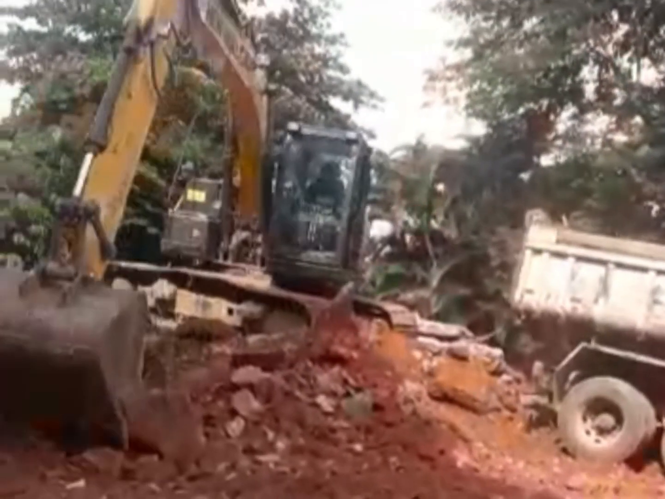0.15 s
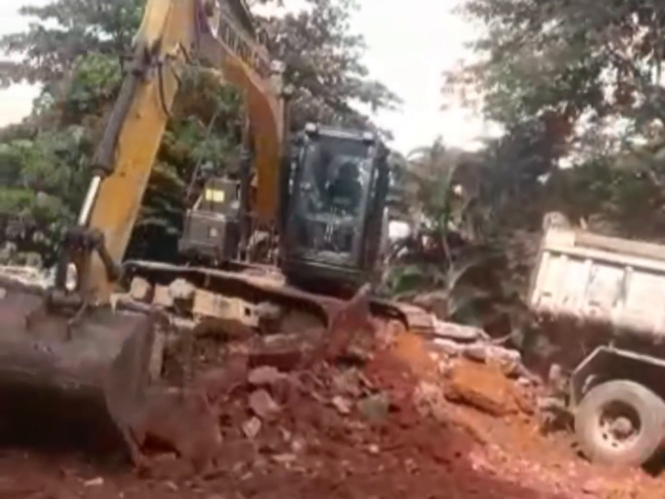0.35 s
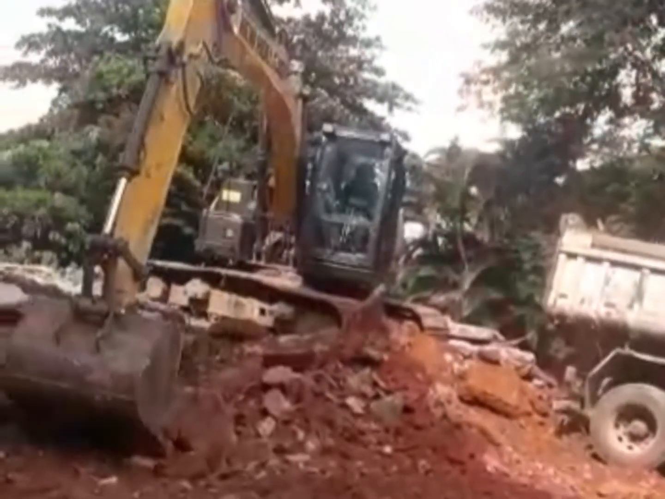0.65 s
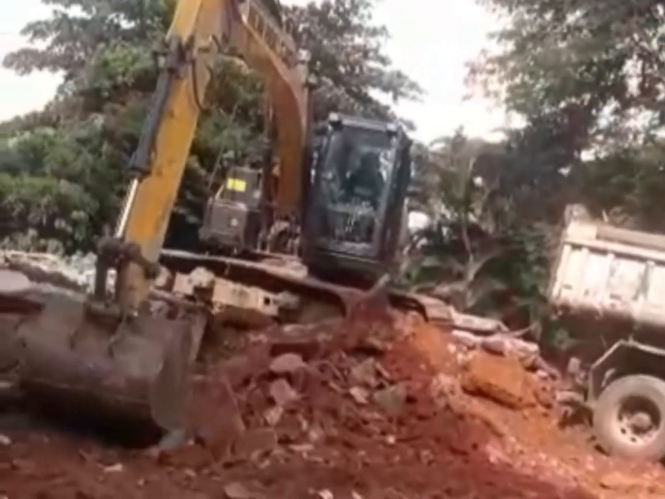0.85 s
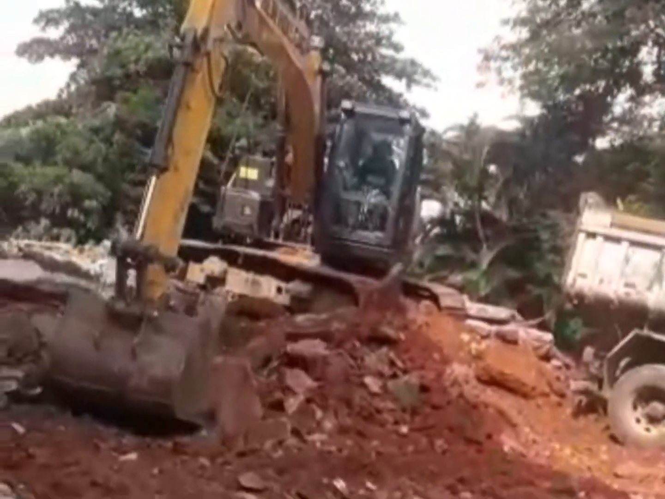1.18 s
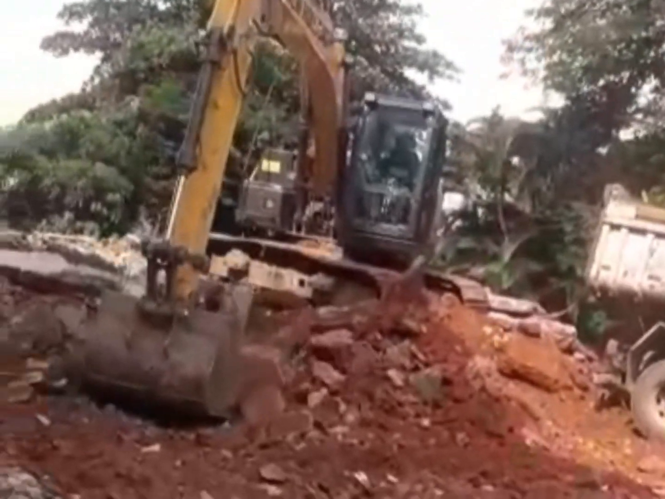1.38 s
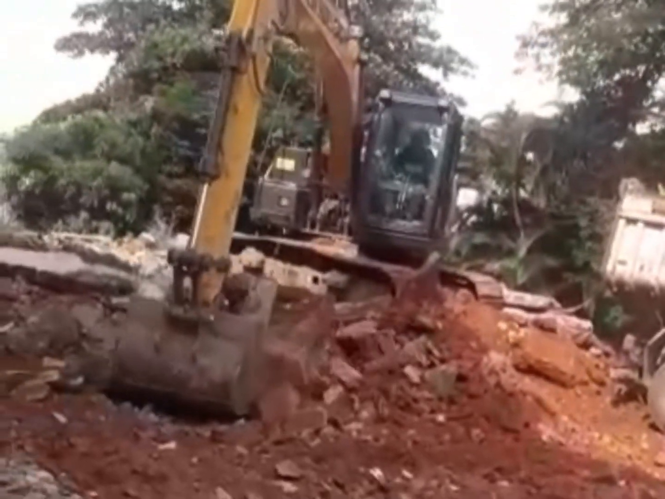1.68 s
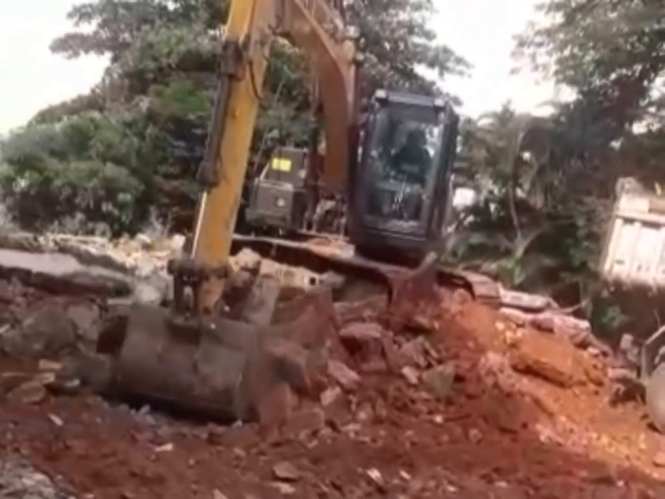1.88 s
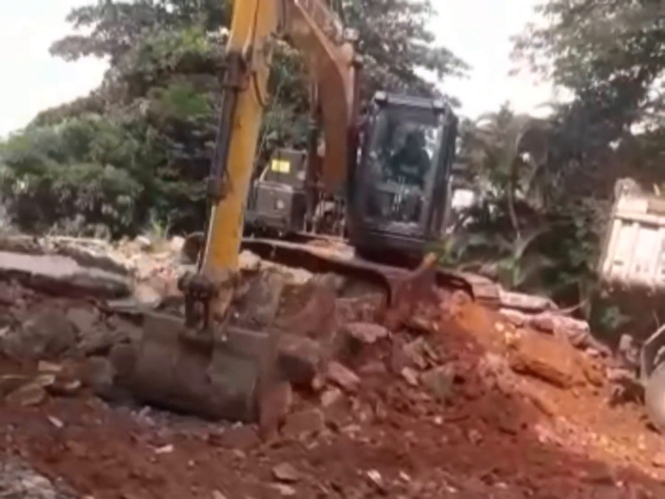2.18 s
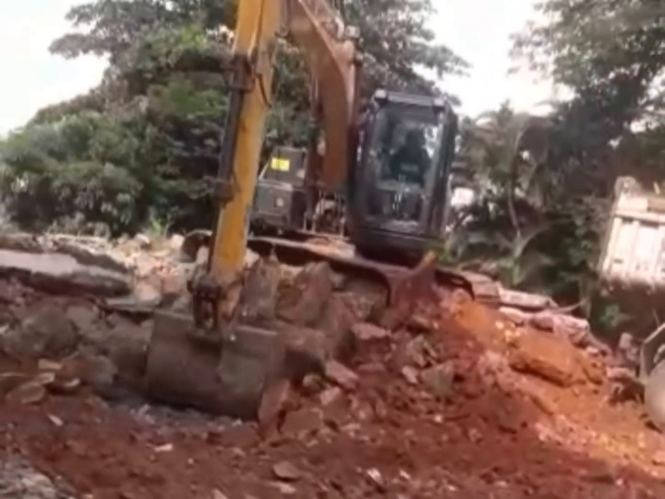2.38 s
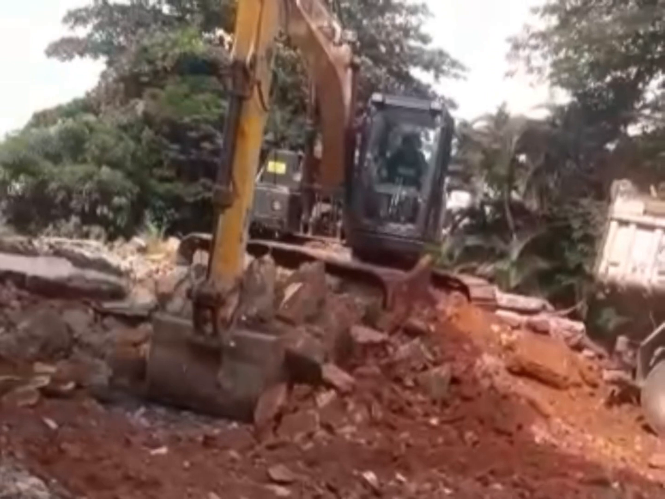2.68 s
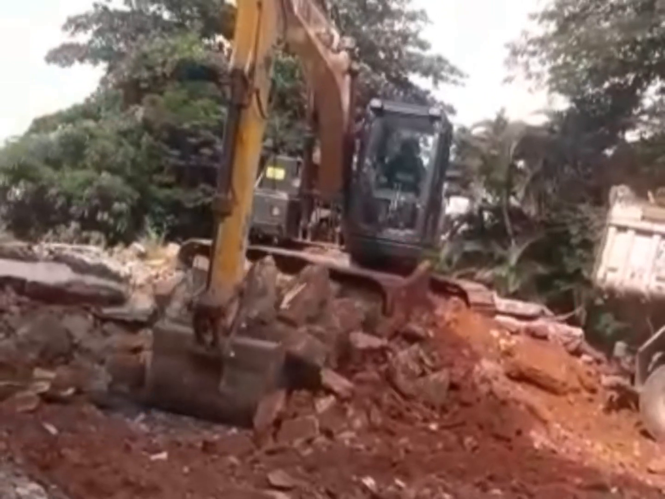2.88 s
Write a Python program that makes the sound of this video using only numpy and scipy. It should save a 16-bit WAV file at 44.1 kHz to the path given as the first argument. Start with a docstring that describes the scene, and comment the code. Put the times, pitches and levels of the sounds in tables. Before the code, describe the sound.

An excavator digs outdoors a few metres away, with a steady diesel rumble and faint hydraulic whine. At about 0.2 seconds its steel bucket clanks down, then grinds and groans through rubble, booming near 0.7. Lighter scrapes, jolts and crackling grit follow. A second shove comes around 2.2 seconds with hollow booms, then stones knock and crack from 2.4 to 3, loudest near 2.8.

```python
"""A diesel rumbles and hydraulic pumps whine: an excavator is working outdoors, a few metres away.
Its steel bucket clanks down and drags through rubble in two main shoves. Many tiny slips make the
teeth grind, and the hollow bucket groans and booms as it jolts over buried rock.
Stones knock, crack and rasp, soil hisses over the steel and grit crackles off the heap."""
import sys
import numpy as np
from scipy import signal
from scipy.fft import rfft, irfft
from scipy.io import wavfile

SR = 44100
rng = np.random.default_rng(int(sys.argv[2]) if len(sys.argv) > 2 else 0)


def generate_wav(signal):
    """Clip the signal to [-1, 1] and save it as 16-bit WAV at the path in sys.argv[1]."""
    frames = np.transpose(np.atleast_2d(signal))
    scaled = np.clip(frames, -1, 1) * 32767
    pcm = np.round(scaled).astype(np.int16)
    wavfile.write(sys.argv[1], SR, pcm)


N = 134505
TIME = np.arange(N) / SR
RING_TIME = TIME[:SR // 2]  # half a second for each short sound

# Levels compare rows within a table. t60 is the time to die away by 60 dB; fade, to fall to 37%.
# low tones of the diesel (multiple of its cycle rate, level/dB)
ENGINE_TONES = [(5, -49), (8, -52), (10, -52.5), (12, -43), (16, -42), (20, -53), (30, -46.5), (42, -50)]
# tone colour of the engine and fan noise (f/Hz, level/dB)
ROAR_COLOUR = [(20, -42), (42, -16.5), (70, -4.5), (115, -2.5), (190, -3), (280, -5), (380, -16),
               (470, -15), (660, -13), (950, -19), (1500, -25), (2200, -30.5), (3200, -43.5), (4500, -52),
               (6500, -61.5), (8000, -61), (10000, -77)]
# ring of the knocking cylinder (f/Hz, level/dB, t60/s)
CYLINDER_MODES = [(244, 2, 0.042), (342.5, 2.5, 0.011), (441, -5.5, 0.045)]
# whines of the pumps (f/Hz, level/dB)
WHINES = [(425, -56.5), (565, -51.5), (600.5, -45.5)]
# soil slides over the steel (loudest t/s, level/dB, half length/s)
SLIDES = [(.565, -62, .025), (.64, -62, .045), (2.13, -70, .06)]
# tone colour of sliding soil (f/Hz, level/dB)
SOIL_COLOUR = [(3000, -25), (5100, -10), (5700, 0), (6500, -1), (7400, -13), (9600, -24), (12000, -17),
               (15500, -15)]
# flow of grit round the bucket (t/s, level/dB)
GRIT_FLOW = [(0, -64), (.46, -66), (.58, -63), (.68, -59), (.77, -57), (.9, -67.5), (1.5, -63.5),
             (1.7, -59.5), (1.9, -63), (2.13, -58), (2.3, -61), (2.56, -64), (3.05, -63)]
# tone colour of grit and stone chips (f/Hz, level/dB)
GRIT_COLOUR = [(1500, -7.5), (2600, 8), (4000, -3), (5000, -4.5), (6200, -7), (7300, -11.5), (8300, -23),
               (9600, -25.5), (12000, -18.5), (16000, -14.5)]
# stones crack under the steel (t/s, level/dB, lowest f/Hz, highest f/Hz, fade/s)
CRACKS = [(.24, -38, 3060, 4150, 0.01), (.368, -63, 5000, 8000, 0.0041), (.75, -55, 3000, 6870, 0.0207),
          (1.402, -56, 3500, 7000, 0.0063), (1.632, -55.5, 7000, 15500, 0.0043),
          (1.934, -57, 5200, 5700, 0.0045), (2.344, -61, 6300, 13800, .007),
          (2.476, -48.5, 3400, 7000, .009), (2.686, -55, 3400, 7000, 0.013), (2.781, -49, 3500, 6500, .003)]
# rocks rasp along the steel (t/s, level/dB, centre f/Hz, fade/s)
RASPS = [(0.368, -30, 1300, 0.025), (.478, -33.5, 1470, 0.032), (0.507, -31.5, 1600, 0.015),
         (1.149, -40, 1364, 0.02), (1.661, -48, 1570, 0.13), (1.94, -44, 1720, 0.049),
         (2.343, -33.5, 1700, 0.013), (2.428, -43, 1410, 0.073)]
# stones knock together, and at 1.633 s the engine knocks more deeply (t/s, level/dB, bass cut f/Hz, treble cut
# f/Hz)
STONE_KNOCKS = [(1.4046, -4.5, 740, 2500), (1.633, -4, 400, 800), (2.4266, 2.5, 990, 1900),
                (2.471, 1.5, 1200, 1600), (2.689, -3.5, 1200, 3500), (2.7807, 9.5, 337, 2300),
                (2.7936, -7, 450, 1000), (2.804, -4, 450, 1000), (2.9507, -7, 900, 2170)]
# ring of a stone slab (f/Hz, level/dB, t60/s)
STONE_MODES = [(555, -1.5, .085), (660, -5, .11), (830, 0, .055), (940, -6, .06), (1000, 7, .016),
               (1421, -7, .03), (1560, -6, .028), (2400, -9, .025), (2885, -16, .07), (3850, -11, .014),
               (6400, -12, .008)]
# how hard the loaded bucket shudders (t/s, level/dB)
SHUDDER_LEVEL = [(0, -58), (.22, -50), (.275, -24), (.33, -31), (.4, -44), (.47, -28), (.53, -26),
                 (.565, -19), (.71, -18), (.79, -22), (.88, -36), (1.04, -46), (1.14, -28), (1.27, -40),
                 (1.65, -43), (1.8, -27.5), (1.92, -40), (2.03, -32), (2.2, -33), (2.3, -22), (2.38, -32),
                 (2.7, -48), (3.05, -42)]
# tone colour of the shudder (f/Hz, level/dB)
SHUDDER_COLOUR = [(40, -46), (80, -12), (105, -3), (130, -1), (160, -4), (196, 0), (225, -7), (270, -3),
                  (350, -15), (600, -40), (3000, -100)]
# groan of the bucket as it sticks and slips (f/Hz, level/dB)
GROAN_TONES = [(145, 0), (196, -2)]
# jolts over buried rock (t/s, level/dB, pitch f/Hz)
JOLTS = [(0.235, -21.5, 158.6), (0.427, -17, 139.4), (0.454, -33.5, 147.6), (0.663, -8, 152.8),
         (0.746, -17.5, 130.6), (1.077, -14.5, 152), (1.745, -17.5, 113.3), (1.788, -20.5, 124.5),
         (1.822, -17, 105.7), (2.211, -15.5, 166.4), (2.251, -8, 163.5), (2.277, -7.5, 150.2),
         (2.3, -13, 159.3), (2.306, -18.5, 103.4), (2.517, -19, 132)]
# hollow ring of the whole bucket (multiple of the jolt's pitch, level/dB, t60/s)
SHELL_MODES = [(0.699, -2.5, 0.11), (0.996, 11.5, 0.097), (1.299, -6, 0.38), (1.799, -11.5, 0.1)]
# how hard the teeth grind (t/s, level/dB)
GRIND_LEVEL = [(0, -61.5), (.43, -41.5), (.51, -37.5), (.575, -27), (.67, -28.5), (.72, -34), (.765, -29),
               (.86, -41.5), (1.05, -46.5), (1.14, -36), (1.27, -49), (1.6, -49.5), (1.69, -40),
               (1.89, -47), (2.0, -41), (2.14, -44.5), (2.2, -36.5), (2.28, -34), (2.4, -41), (2.62, -53.5),
               (2.88, -44), (3.05, -43.5)]
# tone colour of rubble being crushed (f/Hz, level/dB)
RUBBLE_COLOUR = [(150, -27), (400, -16), (530, 3), (740, 3), (950, -5), (1150, -4), (1280, -8.5),
                 (1560, -1.5), (1780, -18.5), (2050, -11), (2500, -23), (3000, -24), (4200, -44),
                 (8000, -56), (10000, -70)]
# ring of the bucket's steel walls (f/Hz, level/dB, t60/s)
WALL_MODES = [(194, 1, .22), (268, -10, .15), (608, -8, .22), (705, -8, .11), (802, -7.5, .16),
              (926, -9, .13), (1055, -13, .1), (1121, -9.5, .17), (1255, -10, .12), (1340, -13, .25),
              (1420, -6, .17), (1637, -8, .2), (2035, -11, .15), (2182, -14.5, .16), (2514, -18, .16),
              (3456, -14, .12)]
# tone colour of the clatter after a blow (f/Hz, level/dB)
CLATTER_COLOUR = [(60, -17.5), (200, 6), (400, -5.5), (750, 7.5), (1150, -1.5), (1650, -3), (2300, -8.5),
                  (3600, -23), (6000, -51.5), (9000, -33)]
# teeth strike rock (t/s, level/dB, treble cut f/Hz)
CLANKS = [(0.2166, 14.5, 1280), (0.2227, 5, 1310), (.233, 4.5, 900), (0.2403, 8, 4400), (0.244, 9, 4660),
          (.2525, -6, 2980), (.26, 7, 2000), (.667, 7, 1770), (2.216, -4.5, 1800), (2.278, -3.5, 1790)]
# tone colour of the microphone's hiss (f/Hz, level/dB)
HISS_COLOUR = [(3000, 0), (6500, -0.5), (8000, -14.5), (9600, -9.5), (11500, -4), (15500, -2.5)]

CYCLE_HZ, FIRST_KNOCK_S = 6.545, .1005  # each cylinder fires once a cycle
SLIPS_PER_S = 1500  # rock catching on steel


def amp(db):
    """Turns decibels into a gain."""
    return 10 ** (np.asarray(db) / 20)


def unit(x):
    """Scales a signal to an average size (rms) of 1."""
    return x / np.sqrt(np.mean(x ** 2) + 1e-20)


def curve(points):
    """Gain over time, joining (t/s, level/dB) points."""
    return amp(np.interp(TIME, *np.transpose(points)))


def add(mix, s, sound):
    """Mixes a sound in at s seconds."""
    part = mix[max(round(s * SR), 0):][:len(sound)]
    part += sound[:len(part)]


def cut(x, hz, kind, order=2):
    """Keeps the "low" side, the "high" side or a "band" of a sound."""
    return signal.lfilter(*signal.butter(order, hz, kind, fs=SR), x)


def colour(x, points, size=8192):
    """Gives a sound the tone colour of (f/Hz, level/dB) points, at rms 1."""
    hz, db = np.transpose(points)
    log_hz = np.log(abs(np.fft.fftfreq(size, 1 / SR)) + 1)
    log_gain = np.log(amp(np.interp(log_hz, np.log(hz), db)))
    response = np.exp(np.conj(signal.hilbert(log_gain)))  # rings after a click, never before
    taps = np.fft.ifft(response).real[:size // 2]
    return unit(signal.fftconvolve(x, taps)[:len(x)])


def soften(x, hz):
    """A softer contact sounds duller, and distance takes away the highest treble."""
    return cut(cut(x, hz, "low"), 6500, "low", order=4)


def drift(hz):
    """Smooth random wobble at rms 1; a higher hz makes it quicker."""
    smoothing = np.exp(-(np.fft.rfftfreq(N, 1 / SR) / hz) ** 2)
    return unit(irfft(rfft(rng.standard_normal(N)) * smoothing, N))


def tone(hz):
    """A sine wave that follows a changing pitch."""
    return np.sin(2 * np.pi * np.cumsum(hz) / SR)


def clicks(per_s, spread_db):
    """Tiny contacts of uneven size at random times."""
    size = amp(spread_db * np.minimum(rng.exponential(1, N), 4))
    return unit(size * rng.choice([-1, 1], N) * (rng.random(N) < per_s / SR))


def ring(modes):
    """An object's own notes (its modes) dying away, with energy 1."""
    out = sum((-1) ** k * amp(db - 60 * RING_TIME / t60) * np.sin(2 * np.pi * hz * RING_TIME)
              for k, (hz, db, t60) in enumerate(modes))
    return out / np.linalg.norm(out)


def burst(t60):
    """Noise dying away, with energy 1."""
    out = rng.standard_normal(len(RING_TIME)) * amp(-60 * RING_TIME / t60)
    return out / np.linalg.norm(out)


def strike(modes, clatter_t60, clatter_db, tick_db):
    """A struck object gives a tick, a dense clatter and clear ringing notes."""
    drive = amp(clatter_db) * burst(clatter_t60)
    drive[0] += amp(tick_db)
    return ring(modes) + colour(drive, CLATTER_COLOUR) * np.sqrt(np.mean(drive ** 2))


def engine():
    """A four-cylinder diesel hums, its roar throbs with each firing, and one cylinder knocks."""
    turn = 2 * np.pi * CYCLE_HZ * (TIME - FIRST_KNOCK_S)
    out = np.zeros(N)
    for multiple, db in ENGINE_TONES:
        level = amp(db + 4.6 * drift(hz=4.9)) * np.sqrt(2)
        out += level * np.cos(multiple * turn + 2 * np.pi * rng.random())
    throb = 1 + 0.13 * np.cos(4 * turn)
    roar = rng.standard_normal(N) * throb * amp(0.62 * drift(hz=24.9))
    out += amp(-36.5) * colour(roar, ROAR_COLOUR)
    rise = 1 - np.exp(-(RING_TIME / .003) ** 2)
    knock = cut(ring(CYLINDER_MODES) * rise, [260, 460], "band")
    for s in np.arange(FIRST_KNOCK_S, N / SR, 1 / CYCLE_HZ):
        add(out, s, amp(rng.normal(-28, 1)) * knock / abs(knock).max())
    return out


def hydraulics():
    """The pumps whine thinly, wavering a little in pitch and level."""
    speed = 1 + .003 * drift(hz=2.5)
    out = np.zeros(N)
    for hz, db in WHINES:
        flutter_db, jitter = 2 * drift(hz=14), .005 * drift(hz=30)
        out += amp(db + flutter_db) * np.sqrt(2) * tone(hz * (speed + jitter))
    return out


def soil():
    """Fine grains hiss over the steel in short slides."""
    level = sum(amp(db) * np.exp(-((TIME - s) / half_s) ** 2) for s, db, half_s in SLIDES)
    return level * colour(clicks(per_s=4800, spread_db=1), SOIL_COLOUR)


def grit():
    """Grit crackles as it flows unevenly round the bucket."""
    grains = clicks(per_s=4500, spread_db=3) * amp(2.5 * drift(hz=30))
    return curve(GRIT_FLOW) * colour(grains, GRIT_COLOUR)


def cracks(rise_s=.0006):
    """A stone cracks in a sudden, bright spray of tiny breaks that dies quickly."""
    out = np.zeros(N)
    for s, db, low_hz, high_hz, fade_s in CRACKS:
        chips = colour(clicks(per_s=9000, spread_db=1)[:len(RING_TIME)], GRIT_COLOUR)
        shape = np.minimum(RING_TIME / rise_s, 1) * np.exp(-RING_TIME / fade_s)
        add(out, s, amp(db) * shape * unit(cut(chips, [low_hz, high_hz], "band")))
    return out


def rasps(rise_s=.0051, width=1.17):
    """A rock scrapes along the steel in a short run of slips that swells and fades."""
    out = np.zeros(N)
    for s, db, hz, fade_s in RASPS:
        slips = clicks(SLIPS_PER_S, spread_db=1.5)[:len(RING_TIME)]
        shape = np.minimum(RING_TIME / rise_s, 1) * np.exp(-RING_TIME / fade_s)
        add(out, s, amp(db) * shape * unit(cut(slips, [hz / width, hz * width], "band")))
    return out


def stone_knocks():
    """Stones knock together; small ones lack the low ring. One deeper knock here comes from the engine."""
    out = np.zeros(N)
    for s, db, low_hz, high_hz in STONE_KNOCKS:
        knock = strike(STONE_MODES, clatter_t60=0.15, clatter_db=-7.5, tick_db=-22)
        add(out, s, amp(db - 5) * cut(soften(knock, high_hz), low_hz, "high"))
    return out


def bucket_shudder():
    """The loaded bucket sticks and slips, so it groans and shudders."""
    groan = sum(amp(db + 2.1 * drift(hz=35.8)) * tone(hz * (1 + .07 * drift(hz=41.2)))
                for hz, db in GROAN_TONES)
    shudder = colour(clicks(per_s=900, spread_db=-0.5), SHUDDER_COLOUR)
    return curve(SHUDDER_LEVEL) * unit(unit(groan) + amp(-1) * shudder)


def bucket_booms(rise_s=.0034):
    """Each jolt over buried rock makes the whole hollow bucket boom."""
    out = np.zeros(N)
    rise = 1 - np.exp(-(RING_TIME / rise_s) ** 2)
    for s, db, hz in JOLTS:
        boom = rise * ring([(hz * ratio, level, t60) for ratio, level, t60 in SHELL_MODES])
        add(out, s, amp(db) * boom / abs(boom).max())
    return out


def bucket_grinding(patches=5, detune=.025, ring_left=.45):
    """Slips crush rubble and ring patches of steel; the rubble's pressure shortens and detunes the ring."""
    slips = clicks(SLIPS_PER_S, spread_db=2.6) * amp(1.8 * drift(hz=80))
    patch_hit = rng.integers(0, patches, N)
    walls = np.zeros(N)
    for k in range(patches):
        modes = [(hz * rng.normal(1, detune), db, t60 * ring_left) for hz, db, t60 in WALL_MODES]
        drive = slips * (patch_hit == k) * amp(2 * drift(hz=15))
        walls += signal.fftconvolve(drive, ring(modes))[:N]
    steel = amp(-7) * unit(soften(walls, hz=2000))
    return curve(GRIND_LEVEL) * unit(steel + colour(slips, RUBBLE_COLOUR))


def bucket_clanks():
    """The teeth hit rock, and each hard blow rings the steel walls."""
    out = np.zeros(N)
    for s, db, hz in CLANKS:
        clank = strike(WALL_MODES, clatter_t60=0.21, clatter_db=-0.5, tick_db=-16)
        add(out, s, amp(db - 5.5) * soften(clank, hz))
    return out


def scene():
    """All sources together; the sharper digging sounds scatter a little off the heap and the trees."""
    digging = bucket_clanks() + bucket_grinding() + stone_knocks() + grit() + rasps() + cracks() + soil()
    scatter = amp(-8.5) * signal.fftconvolve(digging, burst(t60=0.075))[:N]
    return (engine() + hydraulics() + bucket_shudder() + bucket_booms() + digging + scatter)[None]


def record(dry):
    """The microphone thins the deep bass and adds hiss; then the very top of the treble is cut."""
    thinned = cut(dry, 53.3, "high", order=3)
    hiss = amp(-69.5) * colour(rng.standard_normal(N), HISS_COLOUR)
    treble_cut = signal.firwin(511, 15850, window=("kaiser", 9), fs=SR)
    return signal.oaconvolve(thinned + hiss, treble_cut[None], "same")


dry = scene()
out = record(dry)
generate_wav(out)
```